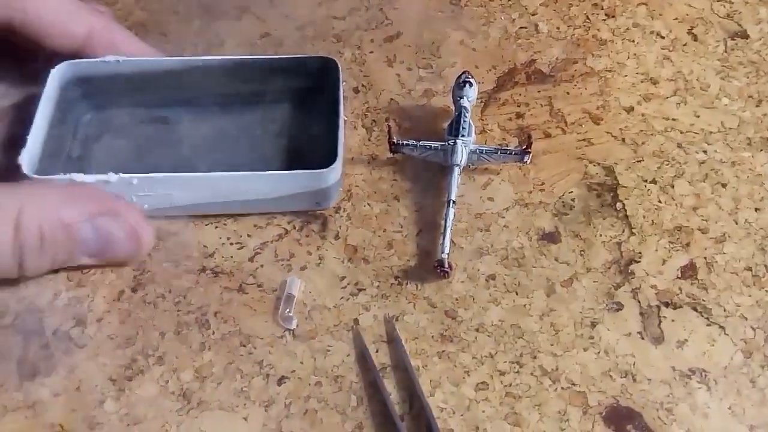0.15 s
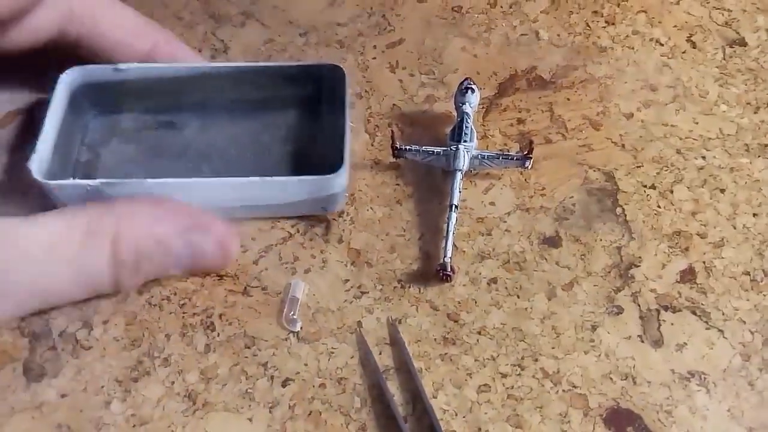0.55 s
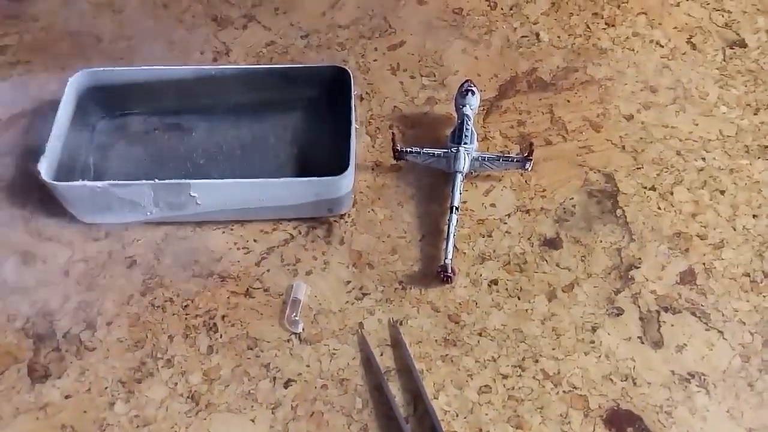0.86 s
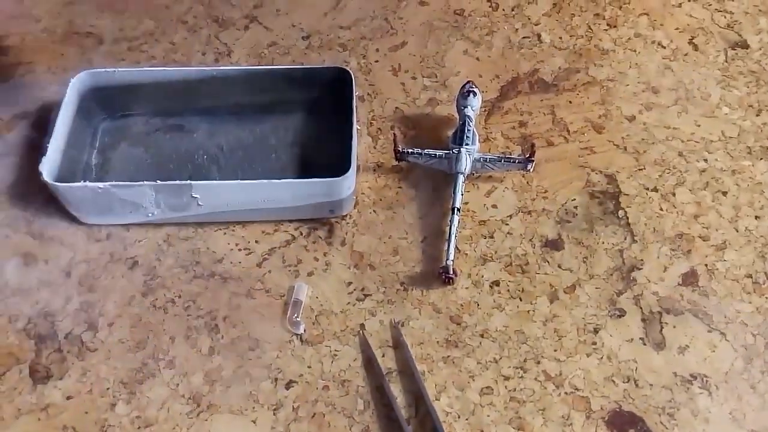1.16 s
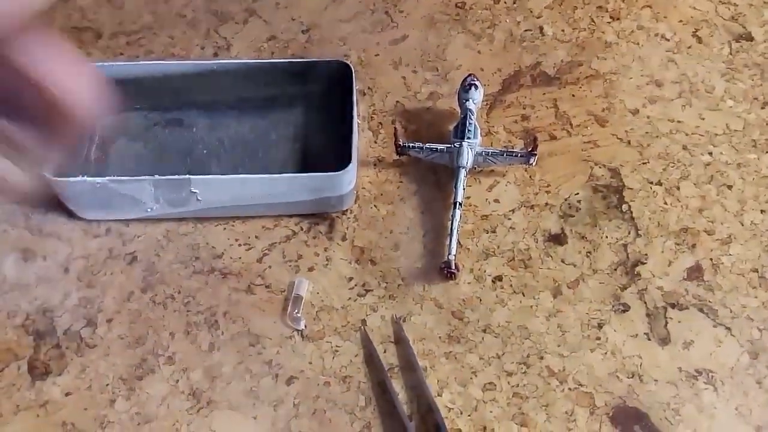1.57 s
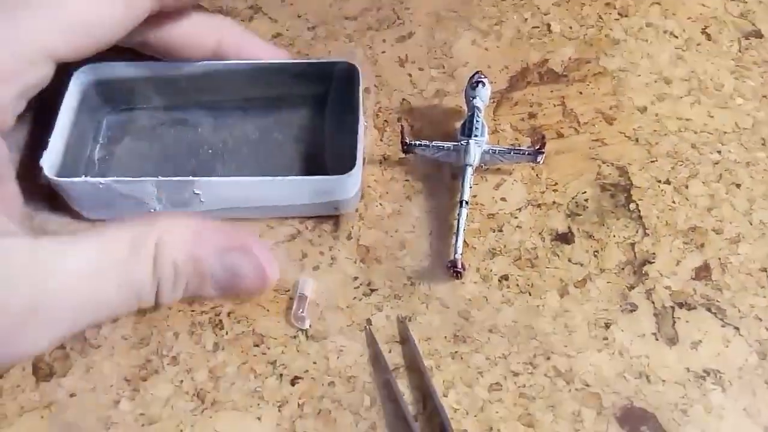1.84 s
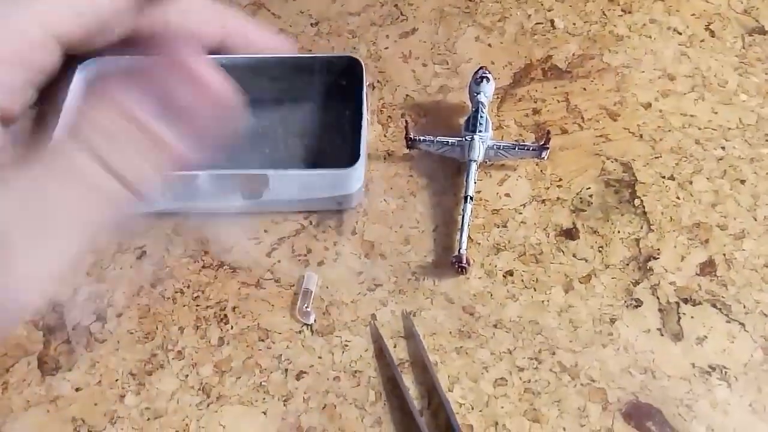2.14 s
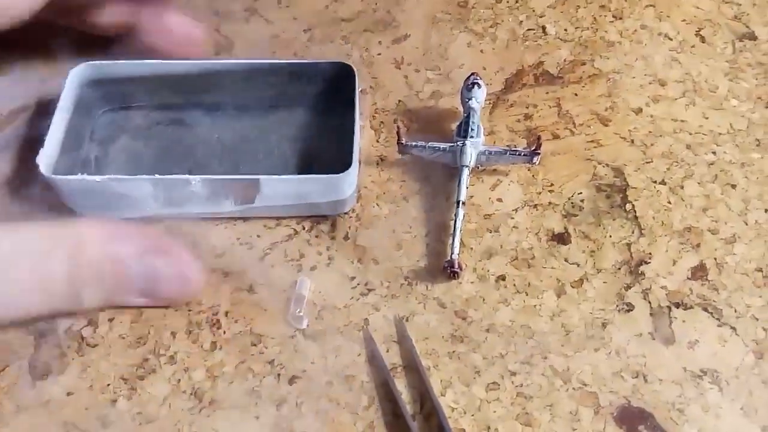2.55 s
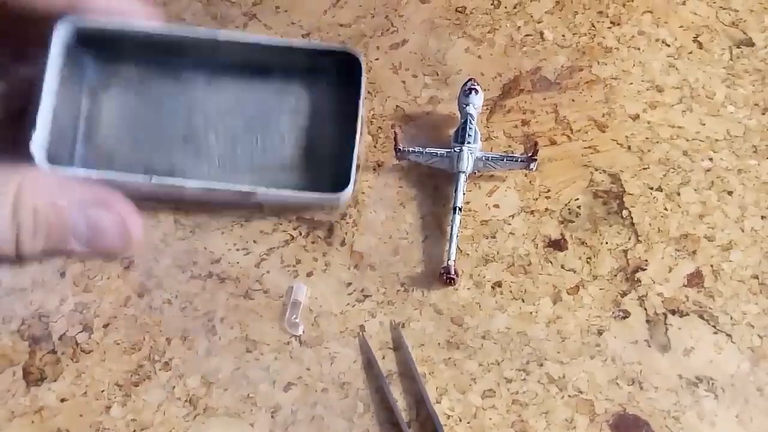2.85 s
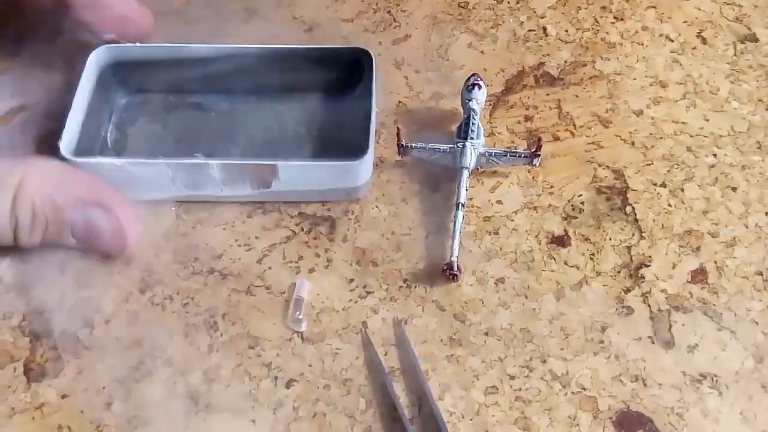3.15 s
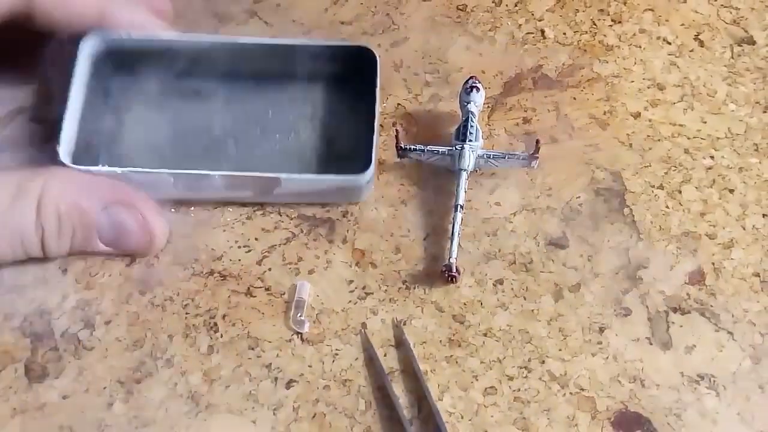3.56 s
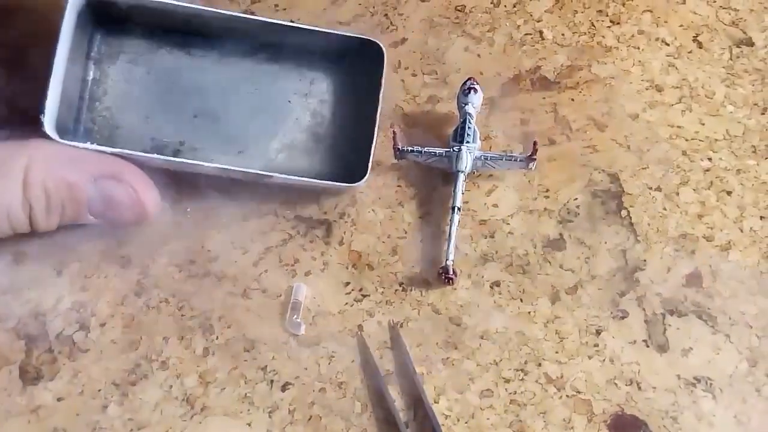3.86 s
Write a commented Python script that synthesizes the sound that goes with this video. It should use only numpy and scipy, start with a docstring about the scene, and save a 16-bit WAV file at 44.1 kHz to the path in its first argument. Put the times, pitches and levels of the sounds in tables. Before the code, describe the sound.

Close up, boiling liquid hisses steadily in a metal tray, with sharp ticks and short sizzling puffs. The tray thuds on a cork-topped table, scrapes a little and lands with one metallic clack over faint room noise.

```python
"""Liquid nitrogen boils in a small metal tray on a cork-topped table, close to the microphone.
It hisses and spits, flaring whenever it sloshes onto warmer metal. A hand nudges the tray, slides it,
tilts it and sets it down with one sharp clack; the tray rings briefly and the table booms under it.
The moving hand puts shifting hollows in the hiss. Room tone and three faint tones sit underneath."""
import sys
import numpy as np
from scipy import signal
from scipy.fft import rfft, irfft, next_fast_len
from scipy.io import wavfile

SR = 44100
rng = np.random.default_rng(int(sys.argv[2]) if len(sys.argv) > 2 else 0)


def put_to_file(sound):
    """Save the sound as 16-bit audio at rate SR, in the file named by the first command-line argument."""
    columns = np.atleast_2d(sound).T  # one column per channel
    safe = np.clip(columns, -1, 1)
    whole_steps = np.round(safe * 32767)
    wavfile.write(sys.argv[1], SR, whole_steps.astype(np.int16))


N = 176400
T = np.arange(N) / SR


def from_db(db):
    """Decibels to gain."""
    return 10 ** (np.asarray(db) / 20)


def rms_one(x):
    """Scale to unit rms."""
    return x / np.sqrt(np.mean(x ** 2) + 1e-20)


def coloured(x, points):
    """Minimum-phase EQ that follows (freq_hz, gain_db) points."""
    size = next_fast_len(N + SR // 2) // 2 * 2
    hz, db = np.transpose(points)
    grid = np.maximum(np.arange(size // 2 + 1) * SR / size, 1)
    cepstrum = irfft(np.log(from_db(np.interp(np.log(grid), np.log(hz), db))))
    cepstrum[1:size // 2] *= 2
    cepstrum[size // 2 + 1:] = 0
    return irfft(rfft(x, size) * np.exp(rfft(cepstrum)))[:N]


def noise():
    """White noise of unit rms."""
    return rng.standard_normal(N)


def drift(hz):
    """Slow random movement of unit spread."""
    r = np.exp(-2 * np.pi * hz / SR)
    return rms_one(signal.lfilter([1], [1, -2 * r, r * r], rng.standard_normal(N + SR))[SR:])


def grains(per_s, spread_db):
    """Random clicks of uneven size, unit rms."""
    sizes = from_db(spread_db * np.minimum(rng.exponential(1, N), 4))
    return rms_one(sizes * rng.choice([-1, 1], N) * (rng.random(N) < per_s / SR))


def click(s):
    """One unit impulse."""
    return 1. * (np.arange(N) == int(s * SR))


def dying(s, t60):
    """Envelope that starts at s and falls 60 dB in t60."""
    return (T >= s) * np.exp(-np.log(1000) * np.clip((T - s) / t60, 0, 2))


def swell(s, rise, fall):
    """Rounded envelope with its top at s."""
    return np.exp(-np.minimum(((T - s) / np.where(T < s, rise, fall)) ** 2 / 2, 20))


def ring(x, hz, t60):
    """A unit click sets a sine of height 1 ringing."""
    r, w = np.exp(-np.log(1000) / (t60 * SR)), 2 * np.pi * hz / SR
    return signal.lfilter([0, np.sin(w)], [1, -2 * r * np.cos(w), r * r], x + 1e-18)


# How hard the liquid boils: time_s, level_db
BOIL_LEVEL = [(0, -40.5), (.3, -47.5), (.72, -45.5), (.86, -50.5), (1.02, -48), (1.22, -53), (1.5, -50),
              (1.72, -55.5), (1.88, -52), (2.02, -44.5), (2.35, -50.5), (2.65, -47), (2.86, -48.5),
              (3.5, -44), (3.66, -43.5), (3.84, -39.5), (4, -40.5)]
# Bright EQ of the escaping gas: freq_hz, gain_db
HISS_EQ = [(200, -17), (1050, -22.5), (1450, -10), (3000, -6), (3900, -8.5), (4800, -1), (6300, 3),
           (16000, -2)]

def boiling(hiss_db=4.5, fizz_db=1.5, flutter_db=0.78, buzz_db=-21.5):
    """Escaping gas hisses and flutters; tiny bubbles fizz and keep the tray faintly ringing."""
    vigour = from_db(np.interp(T, *np.transpose(BOIL_LEVEL)) + flutter_db * drift(hz=21.8))
    gas = from_db(hiss_db) * noise() + from_db(fizz_db) * grains(per_s=700, spread_db=4)
    buzz = from_db(buzz_db) * vigour * damped_tray(gas)
    return hand_hollow(coloured(vigour * gas, HISS_EQ)) + buzz


# The metal tray's free ring: pitch_hz, level_db, t60_s
TRAY_MODES = [(606, -21, 0.93), (772.5, -17, 0.54), (1210, -15, 0.42), (1368.7, 0, 0.34),
              (1445, -1.5, 0.14), (1832, -2.5, 0.14), (2000, -13, .24)]

def damped_tray(x, t60_scale=0.36):
    """The tray sings under a stream of small clicks, damped by fingers and liquid; unit rms."""
    return rms_one(sum(from_db(db) * ring(x, hz, t60 * t60_scale) for hz, db, t60 in TRAY_MODES))


# The band that the hand sweeps through the hiss: time_s, centre_hz, gain_db
HOLLOW_SWEEP = [(0, 3760, -0.5), (.3, 2800, 3.5), (.76, 3500, 5), (.86, 3750, -1.5), (1.4, 3830, 0),
                (1.78, 2920, -6), (2.05, 3300, 0.5), (2.35, 4050, -5.5), (2.74, 3440, 6.5),
                (2.86, 2950, -3), (3, 3400, 8)]

def hand_hollow(x, width_hz=1060, block=256):
    """The gap between hand and tray swallows or lifts one band, which moves with the hand."""
    times, centres, gains = np.transpose(HOLLOW_SWEEP)
    r = np.exp(-np.pi * width_hz / SR)
    b = (1 - r * r) / 2
    band, state = np.zeros(N), np.zeros(2)
    for i in range(0, N, block):
        w = 2 * np.pi * np.interp(i / SR, times, centres) / SR
        feedback = [1, -(1 + r * r) * np.cos(w), r * r]
        band[i:i + block], state = signal.lfilter([b, 0, -b], feedback, x[i:i + block], zi=state)
    return x - band + from_db(np.interp(T, times, gains)) * band


def hand_reflection(x, delay_s=0.001335, swing_s=0.00012, level_db=-8):
    """A bounce off the moving hand adds a slowly wandering comb filter."""
    delay = delay_s + swing_s * drift(hz=1.0)
    return x + from_db(level_db) * np.interp(T - delay, T, x, left=0)


# Dark EQ of the room's background: freq_hz, gain_db
ROOM_EQ = [(25, -12), (90, -1), (300, 0.5), (450, -10.5), (1700, -5.5), (16000, -29)]

def room_tone(level_db=-45):
    """A steady bed of soft, low noise."""
    return from_db(level_db) * coloured(noise(), ROOM_EQ)


# Faint pitched swells: peak_s, fade_s, pitch_hz, waver_hz, level_db
TONE_SWELLS = [(.14, 0.16, 131.8, 3.4, -57), (1.83, 0.16, 2213, 47, -64.5), (1.846, 0.0037, 3710, 60, -51)]

def faint_tones():
    """A low hum, a thin whistle and a short ping, each wavering in pitch."""
    tones = 0
    for s, fade, hz, waver, db in TONE_SWELLS:
        phase = 2 * np.pi * np.cumsum(hz + waver / 2 * drift(waver)) / SR
        tones += from_db(db) * swell(s, fade, fade) * rms_one(np.sin(phase))
    return tones


# The tray rubs or chatters on the cork: peak_s, rise_s, fall_s, body_db, grit_db
SLIDE_CUES = [(.147, 0.0073, 0.012, -49, -29), (.436, 0.013, 0.014, -48.5, -57),
              (2.02, 0.035, 0.027, -58.5, -46), (2.968, 0.041, 0.023, -42, -40.5),
              (3.098, .015, 0.056, -44.5, -50), (3.258, 0.0057, 0.052, -32, -30.5),
              (3.722, 0.017, 0.062, -53.5, -58)]
# Scratchy EQ of grit and snaps: freq_hz, gain_db
GRIT_EQ = [(200, -14), (1000, -10), (1500, 3), (3000, 5.5), (3800, 1), (16000, -1.5)]
# Boomy EQ of the table's body: freq_hz, gain_db
TABLE_EQ = [(45, -35.5), (100, -6), (165, -14), (300, 2.5), (460, -2), (560, -9.5), (1100, -15.5),
            (8000, -42.5)]

def tray_slides(groan_db=-9):
    """Dense slips on the cork sound as grit, make the tray sing and the table groan."""
    slips = grains(per_s=2100, spread_db=3.5)
    body = damped_tray(slips) + from_db(groan_db) * rms_one(coloured(slips, TABLE_EQ))
    grit = coloured(slips, GRIT_EQ)
    return sum(swell(s, rise, fall) * (from_db(body_db) * body + from_db(grit_db) * grit)
               for s, rise, fall, body_db, grit_db in SLIDE_CUES)


# Sloshes onto warmer metal: peak_s, rise_s, fall_s, level_db
FLARE_CUES = [(0.145, 0.0053, 0.0041, -24.5), (1.131, 0.0062, 0.028, -30.5), (1.434, .0045, 0.011, -21.5),
              (2.966, 0.016, 0.048, -30), (3.275, 0.024, 0.044, -24.5)]
# Sizzling EQ of flares and spits: freq_hz, gain_db
SIZZLE_EQ = [(1000, -40), (4000, -12), (5900, 0), (16000, -1.5)]

def flares():
    """Liquid flashes to gas on warm metal in short, bright puffs."""
    envelope = sum(from_db(db) * swell(s, rise, fall) for s, rise, fall, db in FLARE_CUES)
    return coloured(envelope * noise(), SIZZLE_EQ)


# The tray meets the table: start_s, table_db, table_t60_s, tray_db
KNOCK_CUES = [(.141, -43, 0.32, -45.5), (.45, -45, 1, -61), (.791, -39, 0.72, -45.5),
              (.884, -47, 0.66, -64), (1.692, -46.5, 0.17, -63), (1.9772, -42, 0.34, -52),
              (2.1869, -28.5, 0.48, -38.5), (2.33, -41, 0.21, -72), (2.781, -43, 0.19, -58.5),
              (3.2135, -27.5, 0.44, -23), (3.241, -32, 0.66, -39.5), (3.497, -42, 0.19, -71),
              (3.556, -44, 0.22, -53)]
# Hard EQ of the attack: freq_hz, gain_db
CLACK_EQ = [(150, -21), (1200, 4.5), (2600, 0), (6400, 5), (16000, -1.5)]
# EQ of the diffuse metallic tail: freq_hz, gain_db
WASH_EQ = [(300, -5.5), (700, -11.5), (1050, -2.5), (2200, -0.5), (2700, -11), (12000, -12)]

def tray_knocks(clack_db=25.5, crack_db=-11.5, wash_db=9, second_edge_s=0.001395, second_edge_db=-5.5):
    """Two edges land just after each other with a clack; the tray's modes ring on in a diffuse wash."""
    crack = from_db(crack_db) * noise()
    clacks = blows = wash = 0
    for s, _, _, tray_db in KNOCK_CUES:
        edges = click(s) + from_db(second_edge_db) * click(s + second_edge_s)
        clacks += from_db(tray_db + clack_db) * (2 * edges + crack * dying(s, t60=0.035))
        blows += from_db(tray_db) * click(s)
        wash += from_db(tray_db + wash_db) * dying(s, t60=0.42)
    modes = sum(from_db(db) * ring(blows, hz, t60) for hz, db, t60 in TRAY_MODES)
    return coloured(clacks, CLACK_EQ) + modes + coloured(wash * noise(), WASH_EQ)


# The table's low ring: pitch_hz, level_db, t60_scale (times the knock's table_t60_s)
TABLE_MODES = [(107.7, -29, .89), (206.2, -15.5, 1.4), (323.5, 1, 0.91), (437, -20, 1.8)]

def table_knocks(boom_db=16, boom_rise_s=0.0033, rumble_db=-18, sputter_db=4):
    """The table answers each knock with a few low modes, a dense boom and a long sputtering rumble."""
    modes = boom = rumble = 0
    for s, table_db, t60, _ in KNOCK_CUES:
        blow = from_db(table_db) * click(s)
        modes += sum(from_db(db) * ring(blow, hz, t60 * scale) for hz, db, scale in TABLE_MODES)
        attack = np.clip((T - s) / boom_rise_s, 0, 1)
        boom += from_db(table_db + boom_db) * attack * dying(s, t60)
        rumble += from_db(table_db + boom_db + rumble_db) * dying(s, t60=1.09)
    rumble *= from_db(sputter_db * drift(hz=25))
    return modes + coloured(np.hypot(boom, rumble) * noise(), TABLE_EQ)


# Drops burst with a sharp tick: start_s, snap_db, spit_db
DROP_CUES = [(.3485, -30.5, -17), (0.4277, -12.5, -12), (.5065, -13, -13), (.604, -21.5, -23),
             (1.9082, -41, -16), (1.9287, -35, -7), (1.977, -17, -18), (2.1874, -24, -7.5)]

def bursting_drops(scatter_db=-19):
    """Each bursting drop is a click with a brief scatter, part gritty snap and part bright spit."""
    scatter = from_db(scatter_db) * noise()
    snaps = spits = 0
    for s, snap_db, spit_db in DROP_CUES:
        burst = click(s) + scatter * dying(s, t60=0.023)
        snaps += from_db(snap_db) * burst
        spits += from_db(spit_db) * burst
    return coloured(snaps, GRIT_EQ) + coloured(spits, SIZZLE_EQ)


# Dull landings of the tray: start_s, pitch_hz, level_db
THUD_CUES = [(2.1873, 276, -20.5), (2.362, 190, -38.5)]

def cork_thuds():
    """The tray's base lands flat on the cork and sounds one low, heavily damped mode."""
    return sum(ring(from_db(db) * click(s), hz, t60=0.065) for s, hz, db in THUD_CUES)


def scene():
    """Mono mix of boiling liquid, handled tray and table over the room tone."""
    room = room_tone()
    under_hand = hand_reflection(boiling() + flares() + bursting_drops() + tray_slides())
    impacts = tray_knocks() + table_knocks() + cork_thuds()
    return (under_hand + impacts + faint_tones() + room)[None]


# The microphone's response: freq_hz, gain_db
MIC_EQ = [(20, -9), (80, -.5), (6700, 0), (7000, -7), (8100, -23.5), (13900, -45), (15000, -23.5),
          (16000, -33)]

def record(dry, ceiling=7.3, cutoff_hz=15850):
    """The microphone rounds the highest peak and dulls everything above 7 kHz; the top is cut."""
    rounded = ceiling * np.tanh(dry[0] / ceiling)
    high_cut = signal.ellip(12, .2, 80, cutoff_hz, fs=SR, output="sos")
    return signal.sosfilt(high_cut, coloured(rounded, MIC_EQ)[None])


dry = scene()
out = record(dry)
put_to_file(out)
```